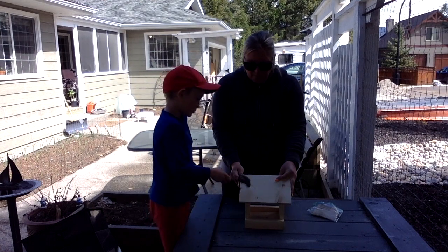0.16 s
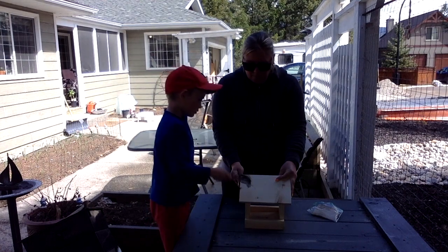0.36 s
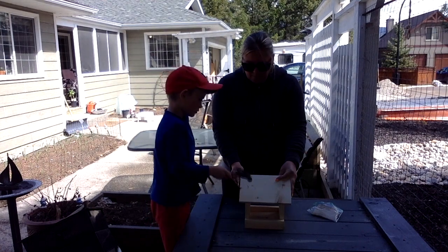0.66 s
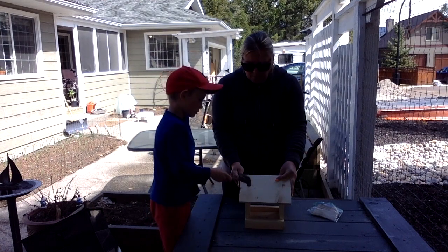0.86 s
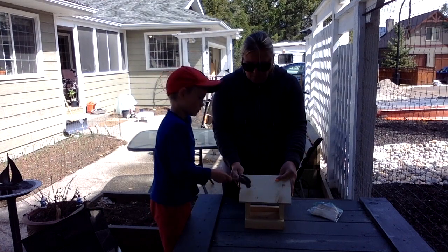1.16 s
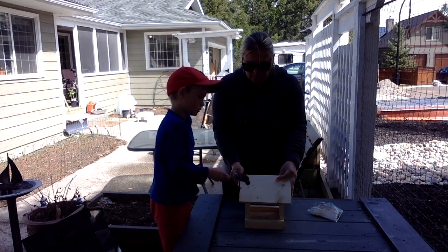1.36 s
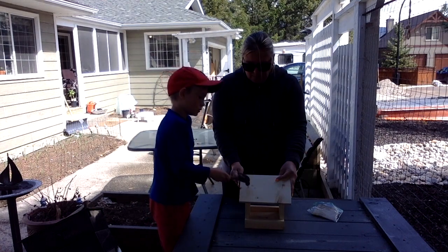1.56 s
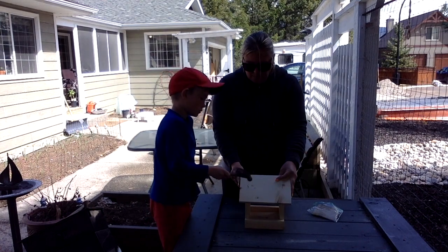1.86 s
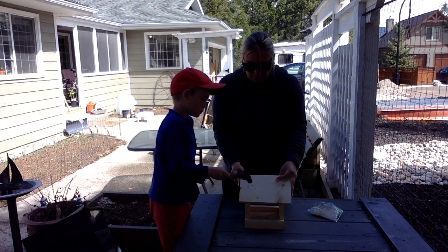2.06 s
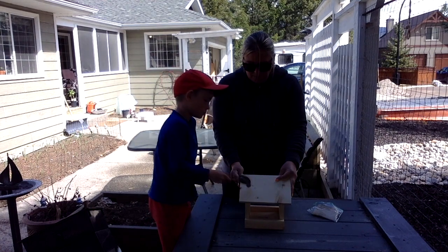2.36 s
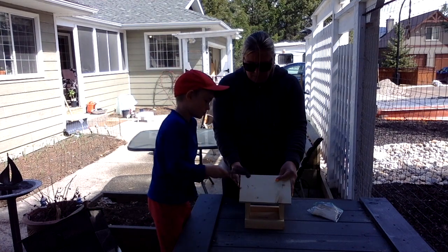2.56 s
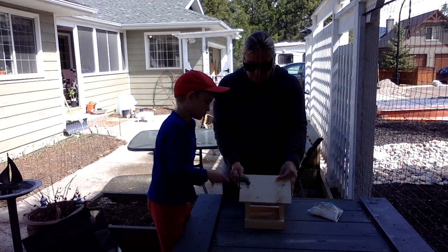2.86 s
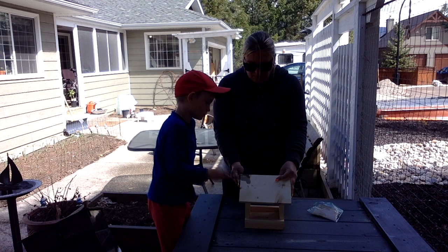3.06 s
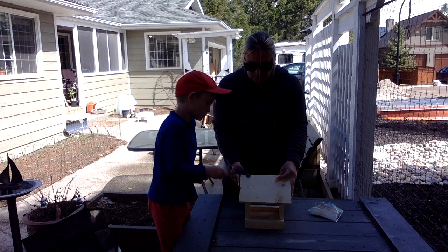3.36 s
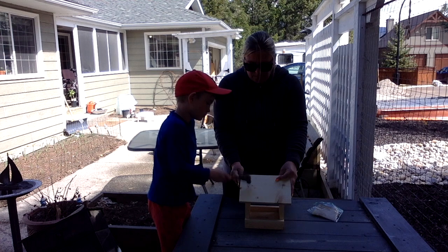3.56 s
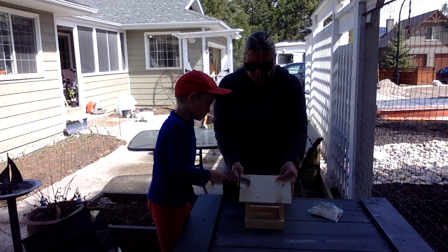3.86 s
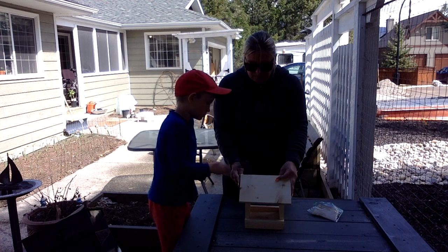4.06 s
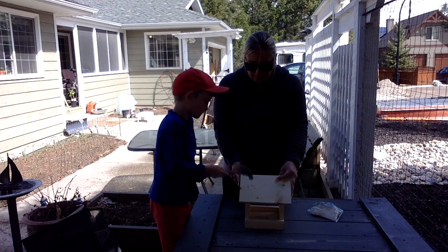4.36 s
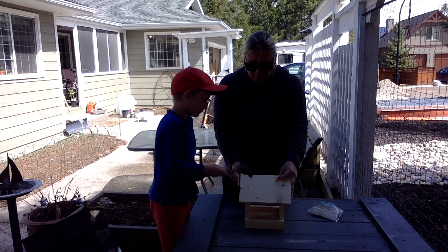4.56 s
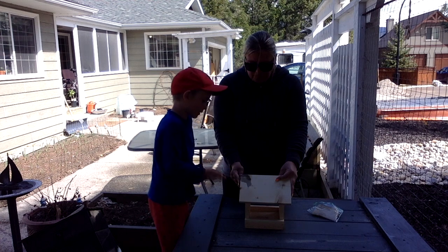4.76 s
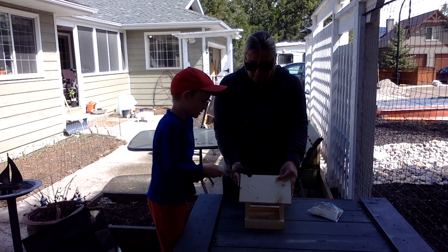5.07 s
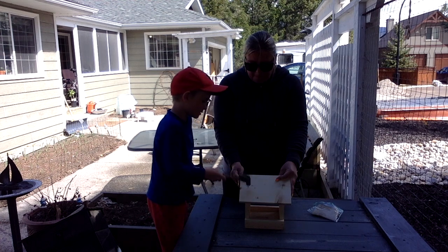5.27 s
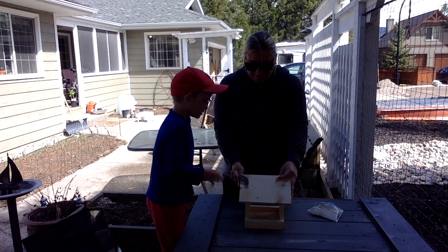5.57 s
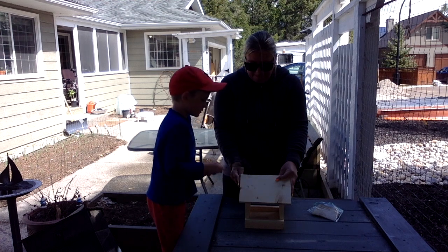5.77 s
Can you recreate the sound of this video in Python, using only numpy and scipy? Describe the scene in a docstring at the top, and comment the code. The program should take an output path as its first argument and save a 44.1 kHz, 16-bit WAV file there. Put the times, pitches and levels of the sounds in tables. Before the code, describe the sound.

Bright, dry hammer blows on a hand-held wooden box fall about every third of a second, then slightly slower, in three groups with roughly one-second gaps. The hardest distort slightly. Small ticks and rattles and one brief early scuff fall between them. Hard walls return short fluttering slaps. Behind lie a weak distant motor, swelling then receding, and thin steady hiss from a simple camera microphone.

```python
"""Throughout, a distant engine drones, swelling and fading, under a hiss and a faint pulsing camera whine,
while a small hammer drives nails into a wooden birdhouse on a patio table between house walls: each blow
is a noise crack of steel on steel plus dying sines for box, table, head and nail, and the walls slap it
back as sparse decaying taps. Small ticks and a brief scuff join in; the input clips the hardest blows."""
import sys
import numpy as np
from scipy import signal
from scipy.fft import rfft, irfft
from scipy.io import wavfile
from scipy.ndimage import uniform_filter1d

SR = 44100
rng = np.random.default_rng(int(sys.argv[2]) if len(sys.argv) > 2 else 0)


def master_out(mix):
    """Clip the mix to full scale and print it as 16-bit PCM to the path in sys.argv[1]."""
    frames = np.transpose(np.atleast_2d(mix))
    ceiling = np.clip(frames, -1, 1)
    pcm = np.round(ceiling * 32767).astype(np.int16)
    wavfile.write(sys.argv[1], SR, pcm)


N = 260190  # length in samples


def gain_of(db):
    """Amplitude factor of a level in dB."""
    return 10 ** (np.asarray(db) / 20)


def evened(x):
    """Scales a signal to rms 1."""
    return x / np.sqrt(np.mean(x ** 2) + 1e-20)


def read(points, hz):
    """Reads a (frequency, value) curve along a logarithmic frequency axis."""
    f, value = np.transpose(points)
    return np.interp(np.log(hz + 1), np.log(f + 1), value)


def along(rows):
    """Joins the rows of a timed table by straight lines, one curve per column."""
    s, *columns = np.transpose(rows)
    return [np.interp(np.arange(N) / SR, s, c) for c in columns]


def add(mix, s, sound):
    """Adds a sound into the mix from second s, cut off at the end of the mix."""
    part = mix[round(s * SR):][:len(sound)]
    part += sound[:len(part)]


def coloured(points, count):
    """Noise of rms 1 with the given spectrum."""
    spectrum = rfft(rng.standard_normal(count))
    shape = gain_of(read(points, np.fft.rfftfreq(count, 1 / SR)))
    return evened(irfft(spectrum * shape, count))


def resonate(x, hz, width):
    """A resonance: shifts hz down to zero, smooths, shifts back and scales to rms 1."""
    turn = np.exp(2j * np.pi * np.cumsum(hz * np.ones(len(x))) / SR)
    r = np.exp(-np.pi * width / SR)
    smooth = signal.lfilter([1 - r], [1, -r], x / turn)
    return evened((turn * smooth).real)


def waver():
    """Slow random wander of rms 1."""
    return evened(uniform_filter1d(uniform_filter1d(rng.standard_normal(N), 2500), 2500))


# Distant engine as it reaches the microphone: (t/s, boom level/dB, level/dB of roar and reference of other orders)
DRONE = [(0, -57.5, -63), (.28, -66, -64.5), (.42, -34.5, -55.5), (.47, -44, -60.5), (.58, -67.5, -63),
         (.76, -69, -66.5), (.9, -48.5, -56.5), (1.0, -51, -60), (1.16, -42.5, -55.5), (1.3, -49, -65),
         (1.7, -49.5, -56), (2.3, -61.5, -68), (2.7, -72, -66.5), (3.5, -64, -69.5), (4.3, -81, -70.5),
         (4.8, -65.5, -70), (5.4, -68, -69), (5.9, -62.5, -64.5)]
# Weaker engine tones: (multiple of the firing rate, level/dB over the roar)
ORDERS = [(1, -30), (2, -12), (3, -3), (5, -4), (6, -11)]
# Spectrum shape of the roar: (f/Hz, relative level/dB)
ROAR = [(60, -25), (115, 7), (300, 14.5), (400, 4.5), (900, 4.5), (1500, -16), (2500, -34.5), (6000, -43)]
BOOM_ORDER = 4  # multiple of the firing rate
FIRING_START_HZ, FIRING_END_HZ, SETTLE_S = 58.16, 55.8, 1.5  # the rate sinks as the engine draws away


def engine():
    """Wavering orders of the firing rate over a roar; the air makes them swell and fade."""
    boom_db, roar_db = along(DRONE)
    sinking = np.exp(-np.arange(N) / SR / SETTLE_S)
    firing_hz = FIRING_END_HZ + (FIRING_START_HZ - FIRING_END_HZ) * sinking
    turns = np.cumsum(firing_hz) / SR
    tones = gain_of(boom_db + waver()) * np.sin(2 * np.pi * BOOM_ORDER * turns)
    for order, db in ORDERS:
        level = gain_of(roar_db + db + 1.3 * waver())
        tones += level * np.sin(2 * np.pi * (order * turns + rng.random()))
    z = signal.stft(coloured(ROAR, N), nperseg=512)[2]
    # turbulence breaks the roar into patches of frequency and time
    patches = uniform_filter1d(rng.standard_normal(z.shape), 4, 0)
    patches = evened(uniform_filter1d(patches, 16, 1))
    roar = evened(signal.istft(z * gain_of(2.8 * patches), nperseg=512)[1][:N])
    return np.sqrt(2) * tones + gain_of(roar_db) * roar


# Spectrum shape of the steady hiss: (f/Hz, relative level/dB)
HISS = [(300, -7), (2000, -4), (8000, -12.5), (12500, -9.5), (15300, -1.5), (15800, 1.5), (16000, -23.5)]
HISS_DB = -78.5  # rms level
# Narrow camera whistles: (f/Hz, width/Hz, level/dB before pulsing)
WHINE = [(11000, 60, -82), (13800, 300, -84), (14250, 110, -80), (14930, 60, -77), (15500, 300, -83)]
WHINE_PER_S, WHINE_START_S = 29.97, .023  # pulses per second, centre of a main pulse


def camera():
    """Steady hiss and narrow whistles that pulse once a picture, with a weaker after-pulse."""
    place = ((np.arange(N) / SR - WHINE_START_S) * WHINE_PER_S + .5) % 1 - .5  # in periods
    pulse = .12 + np.exp(-(place / .13) ** 4)
    pulse += .5 * np.exp(-((place - .36) / .06) ** 2)
    whine = sum(gain_of(db) * resonate(rng.standard_normal(N), hz, width) for hz, width, db in WHINE)
    return gain_of(HISS_DB) * coloured(HISS, N) + pulse * whine


def ring(modes, t, tilt_db=0., spread=0.028):
    """Dying sines; neighbours start in opposite directions and every blow lands a little differently."""
    luck = rng.standard_normal((len(modes), 2))
    total = np.zeros(len(t))
    for k, ((hz, db, t60), (level_luck, pitch_luck)) in enumerate(zip(modes, luck)):
        level_db = db + tilt_db * np.log2(hz / 600) + 2.0 * level_luck
        sine = np.sin(2 * np.pi * hz * (1 + spread * pitch_luck) * t)
        total += (-1) ** k * gain_of(level_db - 60 * t / t60) * sine
    return total


# Spectrum shape of steel on steel: (f/Hz, relative level/dB)
CRACK = [(200, -30.5), (1500, -6.5), (5000, -3), (8000, -11), (11000, -9.5), (14500, -4.5), (15900, -5.5),
         (16300, -21)]
CRACK_DB, CRACK_S = 0.28, .0055  # level relative to the steel level, time scale at neutral treble
CRACK_SHARE = 0.29  # square blows crack harder: share of the wood level
SPLASH = .3  # brighter cracks last longer: dB of length per dB of top treble


def steel_crack(t, treble_db):
    """A noise burst with a fast and a slower decay; its last faint trace hangs on, then stops."""
    shape = [(hz, db + treble_db * (10000 < hz < 15000)) for hz, db in CRACK]
    lengths = t / (CRACK_S * gain_of(SPLASH * treble_db))
    lingering = .008 * gain_of(treble_db) * np.exp(-(t / .085) ** 4)
    fading = np.exp(-3.5 * lengths) + 0.2 * np.exp(-0.47 * lengths) + lingering
    return coloured(shape, len(t)) * fading


# Main modes of the birdhouse before hand damping: (f/Hz, relative level/dB, t60/s)
BOX = [(414.2, 0.5, 0.044), (456.6, -3, 0.042), (575, -4.5, 0.076), (877.6, -4.5, 0.069), (1156, 0, 0.031),
       (1494, -9, 0.033), (1718, -10, 0.072), (2070, -5, 0.055), (2470, -9, 0.0057), (3140, -14.5, 0.047)]
# Dense small modes of the birdhouse, as a noise spectrum: (f/Hz, relative level/dB)
GRAIN = [(150, -14.5), (450, -2), (1200, 2.5), (2200, -6), (4000, -16), (8000, -34)]


def birdhouse(t, bright_db):
    """Wooden modes plus a grain of dense small ones; the hands holding the box soon damp it."""
    shape = [(hz, db + bright_db * np.log2(hz / 600)) for hz, db in GRAIN]
    grain = coloured(shape, len(t)) * gain_of(-60 * t / 0.13)
    box = ring(BOX, t, bright_db, spread=0.011) + 0.76 * gain_of(bright_db) * grain
    onset = 1 - np.exp(-t / 0.0018)
    return box * onset * (0.26 + 0.77 * np.exp(-(t / 0.0092) ** 4))


# Hammer head modes before muting: (f/Hz, relative level/dB, t60/s)
HAMMER = [(3658, -1.5, 0.19), (4930, -6.5, 0.016), (5470, -9, 0.031), (12300, -17.5, 0.0067)]


def hammer_head(t):
    """The head's steel modes, muted once it rests on the nail."""
    return ring(HAMMER, t, spread=0.0032) * (0.027 + np.exp(-(t / 0.0048) ** 4))


# Nail mode before the wood grips it: (f/Hz, relative level/dB, t60/s)
NAIL = [(6395, 3, .45)]


def nail_ring(t):
    """The nail's steady pitch, stopped as the wood grips it."""
    return ring(NAIL, t, spread=0.) * np.exp(-(t / .115) ** 4)


# Patio table modes: (f/Hz, relative level/dB, t60/s)
TABLE = [(57.6, -15, 0.31), (79, -20.5, 0.3), (109, -15, 0.44), (132, -1, .2), (149.86, -1, 0.2),
         (193, -7.5, 0.2), (246.3, 7.5, 0.11), (288, -2.5, 0.15)]
USUAL_WOOD_DB = -12
TABLE_DB, TABLE_SHARE = -16.5, .4  # level at the usual wood level, share by which it follows the wood


def patio_table(t, wood_db):
    """The heavy top swings up slowly, then rings low."""
    level = gain_of(TABLE_DB + TABLE_SHARE * (wood_db - USUAL_WOOD_DB))
    return level * ring(TABLE, t, spread=0.004) * (1 - np.exp(-(t / 0.023) ** 2))


def blow(wood_db, bright_db, steel_db, nail_db, treble_db):
    """Returns what the walls echo and what only reaches the microphone directly."""
    t = np.arange(SR // 2) / SR
    crack_db = steel_db + CRACK_DB + CRACK_SHARE * (wood_db - USUAL_WOOD_DB)
    crack = gain_of(crack_db) * steel_crack(t, treble_db)
    box = gain_of(wood_db) * birdhouse(t, bright_db)
    head = gain_of(steel_db) * hammer_head(t)
    nail = gain_of(nail_db) * nail_ring(t)
    table = patio_table(t, wood_db)
    shaded = .3  # share of the head's ring that gets past the bodies to the walls
    echoed = crack + box + shaded * head + 0.15 * table
    return echoed, (1 - shaded) * head + nail + 0.42 * table


def echo_paths():
    """One path per 12 samples of delay, at a random place with a random sign."""
    at = np.arange(60, SR // 2 - 12, 12)
    return at + rng.integers(0, 12, len(at)), rng.choice([-1., 1.], len(at))


# Wall slaps standing out of the diffuse return: (delay t/s, level/dB over the diffuse taps, smear/s)
SLAPS = [(.005, 1.5, 0.0018), (0.013, 7.5, 0.0022), (.027, 7, 0.0022), (.044, -5, 0.0026),
         (0.069, 4.5, 0.0072), (.097, 5, 0.0042), (0.143, 1.5, 0.0021)]
# Dying of the return between the walls: (f/Hz, t60/s)
YARD = [(100, 0.29), (500, 0.23), (2000, 0.41), (5000, 0.28), (9000, 0.2), (15000, 0.1)]
YARD_DB = -8.5  # return level
NEAR_DB, NEAR_S = 10.5, 0.01  # excess and length of the scatter from table top and bodies


def yard(x, at, signs):
    """Adds sparse taps, louder at each wall slap, every band dying at its own speed."""
    taps, t = np.zeros(SR // 2), np.arange(SR // 2) / SR
    changed = rng.random(len(at)) < 6.0 * t[at]  # far paths change most
    taps[at] = signs * np.where(changed, rng.choice([-1., 1.], len(at)), 1)
    slaps = sum(gain_of(db) * np.exp(-((t - s) / smear) ** 2) for s, db, smear in SLAPS)
    taps *= (1 + slaps) * (1 + gain_of(NEAR_DB) * np.exp(-t / NEAR_S))
    hz, s, z = signal.stft(taps, SR, nperseg=128)
    dying = gain_of(-60 * s / read(YARD, hz)[:, None])
    tail = signal.istft(z * dying, SR, nperseg=128)[1]
    tail /= np.linalg.norm(tail)
    return x + gain_of(YARD_DB) * signal.fftconvolve(x, tail)[:len(x)]


# Blows on the patio table; one glances off the nail and slaps the wood: (t/s, wood level/dB,
# wood brightness/dB per octave, steel level/dB, nail ring level/dB, top treble level/dB)
BLOWS = [(0.1034, -14, -2, -20, -64, 0.5), (0.465, -14.5, -3.5, -19.5, -61, 0.5),
         (0.818, -14, -4.5, -18.5, -55.5, 1), (1.159, -11, -3, -16.5, -49.5, 0.5),
         (1.497, -12.5, -3.5, -16.5, -53.5, -1), (1.53, -42, 1.5, -27.5, -82.5, 3),
         (2.3828, -11.5, -4.5, -16, -53.5, -1), (2.7824, -10.5, -1.5, -15, -54.5, 0),
         (3.169, -10.5, -3.5, -14, -61, 0.5), (3.561, -9.5, -2.5, -14.5, -58.5, 1),
         (3.931, -28.5, -10, -5, -62.5, -1), (3.9453, -10.5, 3, -30.5, -66, -3),
         (4.8729, -10.5, -4, -17, -54, 3), (5.255, -11, -6, -12, -53.5, 5.5),
         (5.6417, -13, -4, -17.5, -78.5, 0)]


def hammering(paths):
    """Every blow, its echoed part sent around the yard and its direct part straight to the microphone."""
    out = np.zeros(N)
    for s, *strengths in BLOWS:
        echoed, direct = blow(*strengths)
        add(out, s, yard(echoed, *paths) + direct)
    return out


# Thin lines that the scuff sets ringing: (f/Hz, level/dB)
SQUEAK = [(2300, -79), (2510, -75), (2780, -71)]
# something scuffs briefly near the table
SCUFF_S, SCUFF_LENGTH_S, SCUFF_RISE_S = .308, 0.14, .012
SCUFF_DB, SCUFF_FADE_DB, SCUFF_HZ = -58.5, -16, 2700  # starting level, change over its length, band centre


def scuff():
    """Fading noise in a band, with three thin lines."""
    t = np.arange(N) / SR - SCUFF_S
    rub = rng.standard_normal(N)
    for _ in range(3):
        rub = resonate(rub, SCUFF_HZ, 1300)
    lines = np.zeros(N)
    for hz, db in SQUEAK:
        lines += gain_of(db) * resonate(resonate(rng.standard_normal(N), hz, 30), hz, 30)
    fading = gain_of(SCUFF_DB + SCUFF_FADE_DB * np.clip(t / SCUFF_LENGTH_S, 0, 1))
    return (fading * rub + lines) * np.clip(t / SCUFF_RISE_S, 0, 1) * (t < SCUFF_LENGTH_S)


# Small ticks and rattles: (t/s, level/dB, centre f/Hz, width/Hz of each of two resonances, t60/s)
TICKS = [(0.313, -51, 1500, 200, 0.1), (0.356, -50, 2380, 700, 0.11), (1.581, -36.5, 12600, 6000, 0.016),
         (1.618, -52.5, 1900, 200, 0.16), (2.826, -41, 1986, 150, 0.17), (4.008, -38.5, 1710, 1300, 0.19),
         (4.085, -50.5, 1740, 990, 0.29), (4.2, -67.5, 1880, 905, 0.69), (4.8295, -52.5, 3650, 300, .025),
         (4.84, -60.5, 1190, 151.1, 0.2), (5.136, -55.5, 3960, 395, 0.079)]


def ticking(paths):
    """Dying bursts of noise through a doubled resonance, echoed by the yard."""
    ticks, t = np.zeros(N), np.arange(SR // 2) / SR
    for s, db, hz, width_hz, t60 in TICKS:
        clink = resonate(resonate(rng.standard_normal(len(t)), hz, width_hz), hz, width_hz)
        add(ticks, s, gain_of(db - 60 * t / t60) * clink * np.minimum(t / 0.0008, 1))
    return yard(ticks, *paths)


def scene():
    """Everything at the microphone; blows and ticks share the same echo paths."""
    paths = echo_paths()
    return (engine() + camera() + hammering(paths) + scuff() + ticking(paths))[None]


def record(dry):
    """The input stage clips the hardest blows; the microphone drops the deep bass; then the band limit."""
    clipped = np.clip(dry, -.52, .52)
    thinned = signal.sosfilt(signal.butter(2, 50, "high", fs=SR, output="sos"), clipped)
    band_limit = signal.firwin(255, 16600, window=("kaiser", 9), fs=SR)  # cutoff in Hz
    return signal.oaconvolve(thinned, band_limit[None], "same")


dry = scene()
out = record(dry)
master_out(out)
```